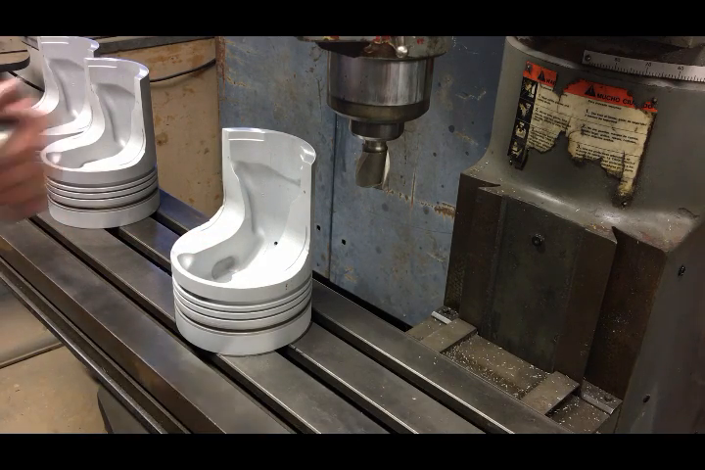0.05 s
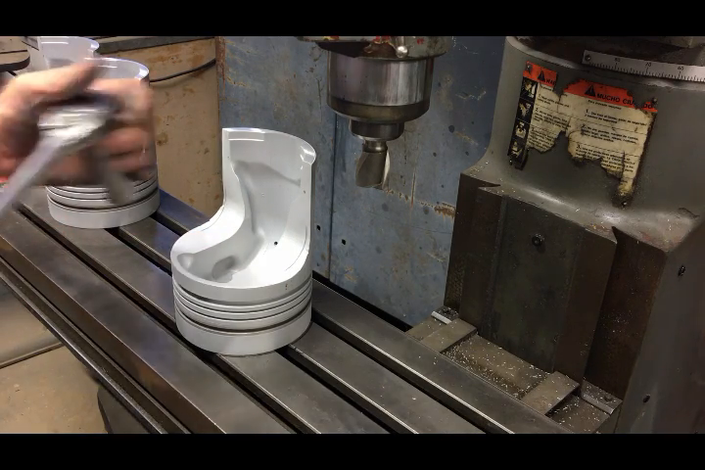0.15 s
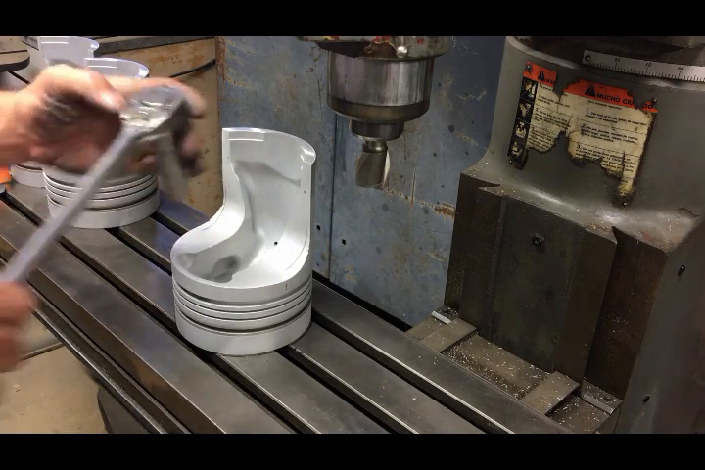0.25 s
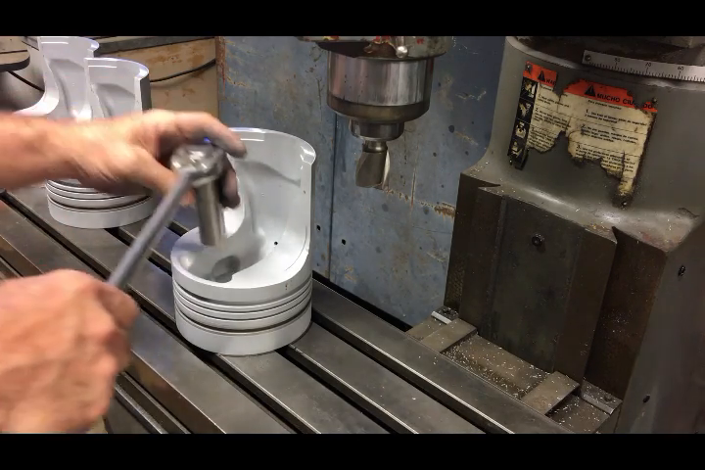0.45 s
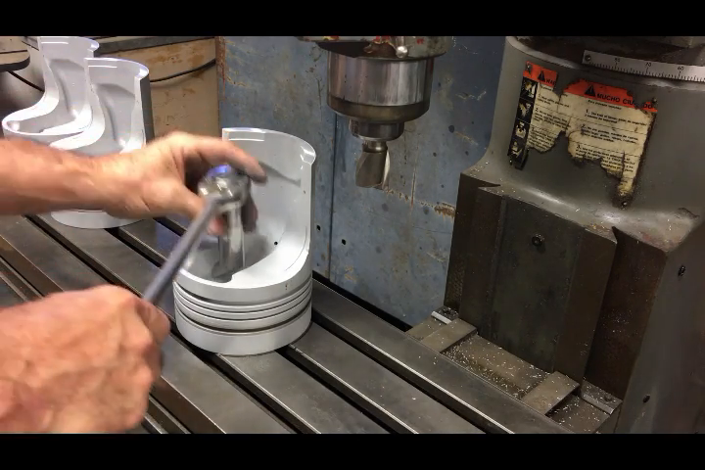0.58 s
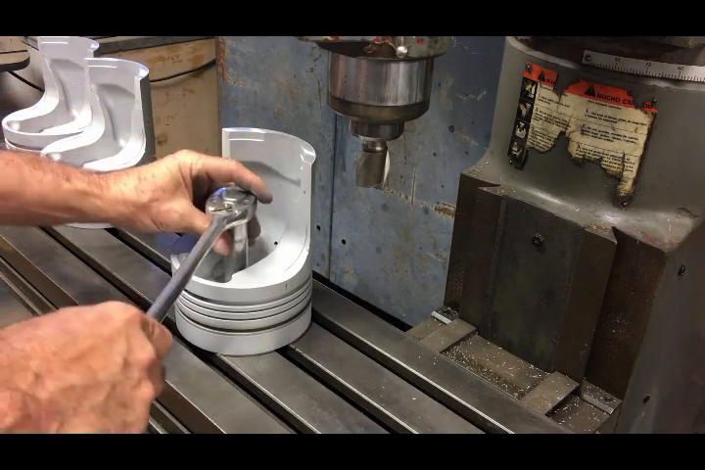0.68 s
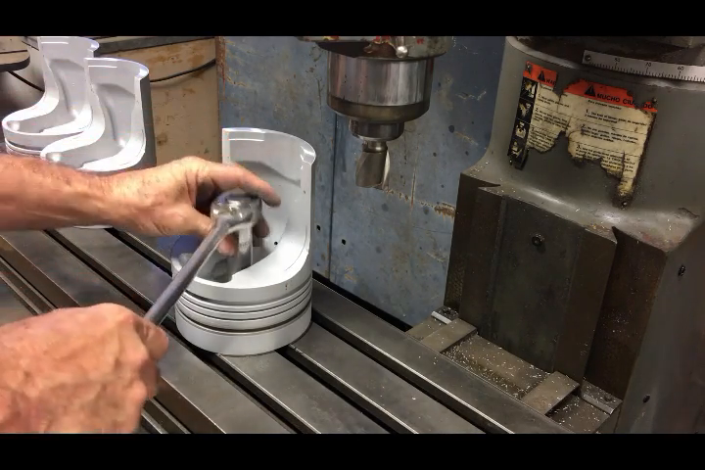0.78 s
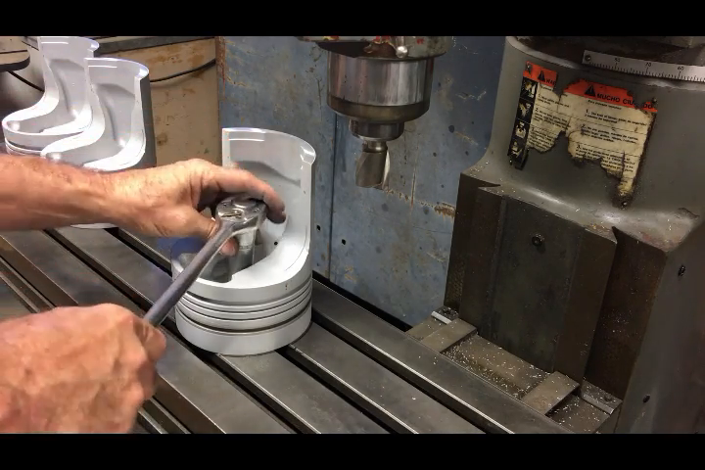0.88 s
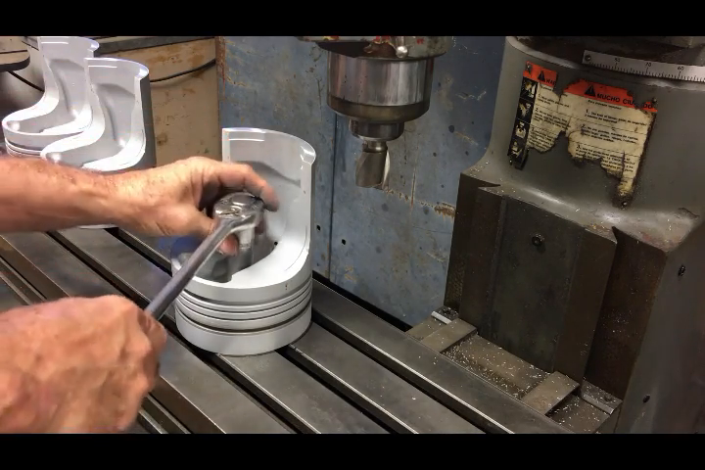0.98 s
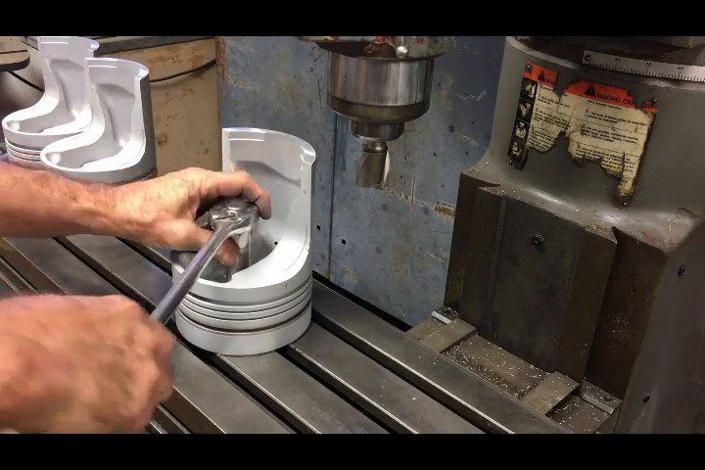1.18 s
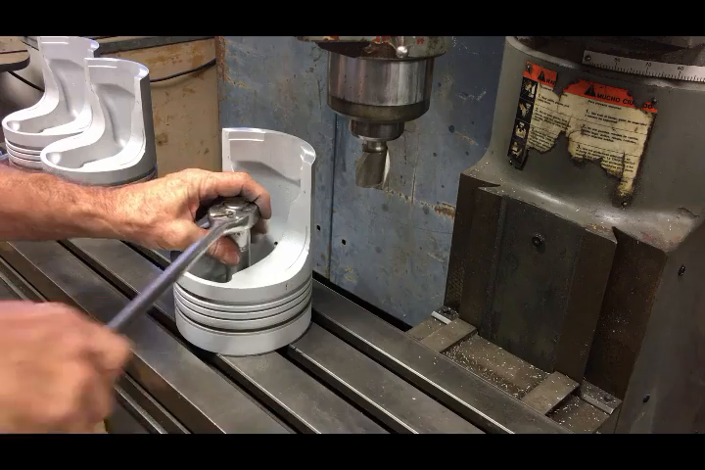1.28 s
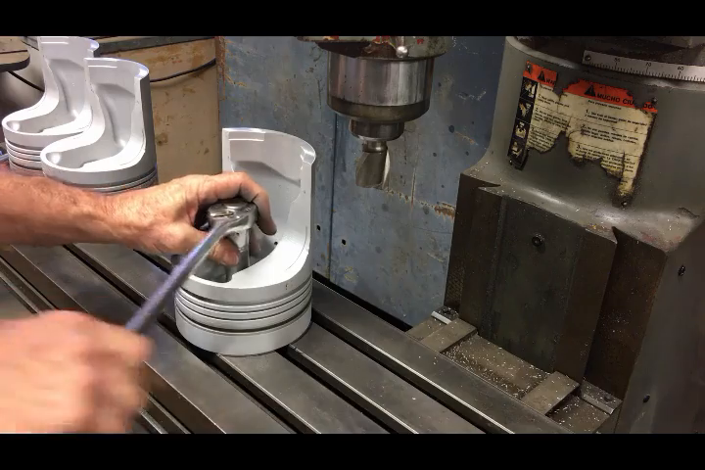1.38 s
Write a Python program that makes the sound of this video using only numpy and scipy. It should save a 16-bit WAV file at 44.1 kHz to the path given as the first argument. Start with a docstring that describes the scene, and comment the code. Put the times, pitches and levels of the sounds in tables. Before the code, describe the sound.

Sharp metallic clicks and clanks of a wrench being set into a piston, over low hum.

```python
"""Bright clicks come first: the loose jaws of a steel wrench being lowered into a heavy piston.
The wrench then knocks against the piston and seats with a clank. Each contact is a short crack
plus ringing modes. The milling table under the piston reflects the sound and thuds on firm
contacts, and the workshop answers with a short tail, over steady air and a low hum."""
import sys
import numpy as np
from scipy import signal
from scipy.fft import rfft, irfft, next_fast_len
from scipy.io import wavfile
from scipy.ndimage import uniform_filter1d

SR = 44100
rng = np.random.default_rng(int(sys.argv[2]) if len(sys.argv) > 2 else 0)


def store_pcm(level_fs):
    """Save levels as 16-bit WAV."""
    pcm = np.round(np.clip(level_fs, -1, 1) * 32767).astype(np.int16)
    wavfile.write(sys.argv[1], SR, np.atleast_2d(pcm).T)


N = 63945


def undb(db):
    """Decibels to gain."""
    return 10 ** (np.asarray(db) / 20)


def unit(x):
    """Scale to rms 1."""
    return x / np.sqrt(np.mean(x ** 2))


def fade(t, t60):
    """Exponential decay."""
    return np.exp(-np.log(1000) * t / max(t60, 1e-3))


def colour(x, points):
    """Causal filter through (Hz, dB) points."""
    hz, db = np.array(points, float).T
    n = 2 * next_fast_len(len(x))
    f = np.maximum(np.arange(n // 2 + 1) * SR / n, 1)
    cepstrum = irfft(np.log(undb(np.interp(np.log(f), np.log(hz), db))))
    cepstrum[1:n // 2] *= 2
    cepstrum[n // 2 + 1:] = 0
    return irfft(rfft(x, n) * np.exp(rfft(cepstrum)))[:len(x)]


def add(out, x, start_s):
    """Mix x into out from a given time."""
    i = int(max(start_s, 0) * SR)
    out[i:i + len(x)] += x[:len(out) - i]


# Tone bands of a contact, each set by one of its band_db values: centre_hz
BANDS_HZ = [1000, 2400, 5000, 9000, 13500]
ATTACK_S, CRACK_T60_S = 0.0006, 0.016
MODE_SCATTER_DB = 2  # each contact favours other modes
SPLIT_HZ = 62  # the parts are not quite symmetric, so each mode is a close pair


def strike(modes, crack_tone, hold_s, ring_db, spot_hz, spot_db, spot_t60_s, *band_db):
    """Metal on metal: a sharp crack that holds its level for a few milliseconds, then dies away,
    with ringing mode pairs and the struck spot's ping."""
    t = np.arange(SR // 4) / SR

    def partial(hz, db, t60):
        return undb(db) * fade(t, t60) * np.sin(2 * np.pi * (hz * t + rng.random()))

    crack_noise = rng.standard_normal(len(t)) * fade(np.maximum(t - hold_s, 0), CRACK_T60_S)
    crack = colour(crack_noise, crack_tone)
    body = 0
    for hz, db, t60 in modes:
        for side in (-1, 1):
            pitch_hz = hz + side * SPLIT_HZ * rng.random()
            body += partial(pitch_hz, db + MODE_SCATTER_DB * rng.standard_normal(), t60)
    ring = undb(ring_db) * body / np.sqrt(2) + partial(spot_hz, spot_db, spot_t60_s)
    hit = (crack + .5 * ring) * np.minimum(t / ATTACK_S, 1)
    return colour(hit, list(zip(BANDS_HZ, band_db)))


# Ring of the wrench: pitch_hz, level_db, t60_s
WRENCH_MODES = [(3733, -7, 0.04), (4580, -4, 0.058), (4840, -9, .045), (5620, -4, 0.073),
                (5646, -7.5, 0.067), (7060, -17, 0.098), (7570, -1, 0.022), (7630, -4.5, 0.068),
                (9400, -5.5, 0.047), (10650, -10, 0.048), (12300, -11, .025), (13400, -30, .03),
                (14470, -31, .04)]
# Crack of the jaws, their dense, quickly damped overtones: frequency_hz, level_db
JAW_CRACK_TONE = [(100, 1), (600, -9.5), (1400, -8.5), (1900, 4), (2700, 0.5), (3600, 2.5), (5600, 6),
                  (6500, -2.5), (7300, -2), (8400, -5), (9300, -1), (11500, -4.5), (13300, -1.5),
                  (16000, -9.5)]
# Jaw clicks: start_s, hold_s, ring_db, spot_hz, spot_db, spot_t60_s, five band_db
JAW_CLICKS = [ (0.1988, 0.0013, -10, 3800, -6, .02, -57, -29.5, -36, -40, -47),
              (0.2024, 0.0028, -0.5, 3690, 4, 0.045, -25, -22, -13.5, -10.5, -12),
              (0.2441, 0.0023, -0.5, 3580, 2.5, 0.037, -31, -27, -25, -31.5, -37),
              (0.2903, 0.0021, -7, 1448, 0, 0.053, -42, -26, -36.5, -31.5, -42),
              (0.566, 0.0028, -3, 5100, 5, .02, -35, -35, -55.5, -55, -68),
              (0.6119, 0.0019, -5, 7700, -5.5, 0.3, -40, -16.5, -19.5, -24.5, -14.5),
              (0.641, 0.0035, -1, 5640, 5.5, 0.04, -25, -23, -20.5, -18, -13),
              (0.6842, 0.0026, 2.5, 13350, 5, 0.022, -21.5, -22, -21.5, -21, -16),
              (0.7525, 0.002, -5.5, 7100, -1.5, 0.071, -26, -22.5, -23, -18.5, -13),
              (.7590, 0.0034, -8, 14000, 2, 0.017, -29, -39, -26, -22.5, -25)]


def jaw_clicks():
    """The loose jaws of the wrench click brightly on the way down."""
    out = np.zeros(N)
    for start_s, *contact in JAW_CLICKS:
        add(out, strike(WRENCH_MODES, JAW_CRACK_TONE, *contact), start_s)
    return out


# Bassy body of a thud: frequency_hz, level_db
THUD_TONE = [(40, -25), (80, 2), (250, -6), (450, -13), (1000, -19), (4000, -58)]
# Firm contacts that reach the milling table: start_s, level_db
TABLE_THUDS = [(0.2027, -40), (0.244, -45), (1.08, -41)]


def table_thuds():
    """The heavy table answers firm contacts with a dull thud."""
    out = np.zeros(N)
    t = np.arange(SR // 4) / SR
    for start_s, level_db in TABLE_THUDS:
        rumble = unit(colour(rng.standard_normal(len(t)), THUD_TONE))
        add(out, undb(level_db) * rumble * fade(t, t60=0.084), start_s)
    return out


# Ring of the piston: pitch_hz, level_db, t60_s
PISTON_MODES = [(948, -8.5, 0.039), (1050, -8.5, 0.041), (1825, -10.5, 0.083), (2247, -13, 0.11),
                (2800, -16, 0.039), (2890, -21, 0.032), (3520, -14, 0.076), (4830, -14, 0.081),
                (5540, -8.5, 0.087), (6435, 0, 0.052), (7100, -13, 0.086), (9270, -9.5, 0.056)]
# Crack of the piston, its dense, quickly damped overtones: frequency_hz, level_db
PISTON_CRACK_TONE = [(100, -10), (550, -24.5), (720, -7), (920, -0.5), (1200, -2.5), (1500, -2.5),
                     (2100, 0.5), (3000, 3.5), (3800, 0), (5400, 1.5), (8200, -5), (9300, -3),
                     (11500, -0.5), (13300, 0.5), (16000, -7)]
# Piston knocks: start_s, hold_s, ring_db, spot_hz, spot_db, spot_t60_s, five band_db
PISTON_KNOCKS = [ (.8760, 0.0018, -1.5, 4190, 10.5, 0.016, -21.5, -17.5, -18.5, -35, -32),
                 (.8778, 0.0012, 1, 12620, 2.5, 0.043, -17.5, -28, -23, -14, -21.5),
                 (0.8779, 0.0022, -5, 1175, 10, 0.02, -21.5, -14, -17.5, -15.5, -36),
                 (0.9831, 0.0011, -1, 2980, 10, 0.052, -39, -35, -51, -50, -55),
                 (0.988, 0.0018, -1.5, 1990, -9, .02, -21, -25.5, -49, -63, -59),
                 (0.9933, .001, -15, 4760, 1.5, 0.024, -38, -23.5, -33, -49, -47),
                 (1.0700, .002, 6, 2880, 13, 0.012, -24.5, -30.5, -46, -80, -76),
                 (1.0799, 0.0049, -1.5, 2156, 1.5, 0.032, -22.5, -14, -21, -13.5, -16.5),
                 (1.088, 0.0011, -2, 2848, 7.5, 0.027, -16.5, -17.5, -14, -29, -33),
                 (1.1166, 0.0036, 0.5, 2853, 12, 0.024, -17, -15, -18, -20, -28),
                 (1.1185, .002, -4, 887, 4.5, 0.025, -16.5, -19.5, -31, -37, -61),
                 (1.4262, .002, -27, 2210, 9, 0.011, -38, -25, -53.5, -56, -65)]


def piston_knocks():
    """The wrench knocks on the piston and seats in it with a clank."""
    out = np.zeros(N)
    for start_s, *contact in PISTON_KNOCKS:
        add(out, strike(PISTON_MODES, PISTON_CRACK_TONE, *contact), start_s)
    return out


# Reverb tail of the workshop: centre_hz, level_db, t60_s
ROOM_BANDS = [(300, -2.5, 0.37), (1000, -7.5, 0.4), (2230, -11, 0.35), (4900, -15, 0.59), (8700, -17, 0.47),
              (14900, -16, 0.16)]
REFLECTION_S, REFLECTION_DB = .0065, -13
ROOM_DELAY_S, ROOM_BUILD_S, ROOM_DB = .006, 0.0027, -1


def workshop(x):
    """Adds a hard reflection off the table and a diffuse tail whose very top dies first."""
    t = np.arange(SR // 2) / SR
    log_hz = np.log(np.maximum(np.fft.rfftfreq(len(t), 1 / SR), 1))
    log_centres = np.log([row[0] for row in ROOM_BANDS])
    noise_spectrum = rfft(rng.standard_normal(len(t)))
    tail = 0
    for share, (_, level_db, t60_s) in zip(np.eye(len(ROOM_BANDS)), ROOM_BANDS):
        band = irfft(noise_spectrum * np.interp(log_hz, log_centres, share), len(t))
        envelope = fade(t, t60_s) * (1 - np.exp(-t / ROOM_BUILD_S))
        tail += undb(level_db) * band * envelope / np.linalg.norm(envelope)
    out = x.copy()
    add(out, undb(REFLECTION_DB) * x, REFLECTION_S)
    add(out, undb(ROOM_DB) * signal.fftconvolve(x, tail)[:N], ROOM_DELAY_S)
    return out


def waver():
    """A smooth random drift with rms 1."""
    drift = uniform_filter1d(rng.standard_normal(N), size=1500)
    return unit(uniform_filter1d(drift, size=1500))


# Dark bed of shop air: frequency_hz, level_db
AIR_TONE = [(13, -35), (22, -22), (48, -1.5), (85, -2.5), (118, -6.5), (140, -6), (242, -6.5), (496, -10),
            (710, -9), (771, -8), (1130, -9), (2020, -19), (2200, -19), (2820, -26.5), (3230, -29.5),
            (11500, -34.5), (16000, -37)]
AIR_DB = -48
HUM_HZ, HUM_DB, HUM_WANDER_HZ, HUM_SWELL = 70.4, -54.5, 5.9, 0.64


def air_and_hum():
    """Under everything, steady air and a low hum that wavers in pitch and level."""
    air = unit(colour(rng.standard_normal(N), AIR_TONE))
    pitch_hz = HUM_HZ + HUM_WANDER_HZ * waver()
    hum = np.sin(2 * np.pi * np.cumsum(pitch_hz) / SR) * (1 + HUM_SWELL * waver())
    return undb(AIR_DB) * air + undb(HUM_DB) * unit(hum)


def scene():
    """Clicks and knocks ring in the workshop over dry thuds and the room tone, in mono."""
    metal = workshop(jaw_clicks()) + workshop(piston_knocks())
    return (metal + table_thuds() + air_and_hum())[None]


def record(dry):
    """Soft saturation rounds the loudest peaks and a steep low-pass cuts the top."""
    ceiling, top_hz = .48, 15900
    lowpass = signal.ellip(10, .2, 70, top_hz, fs=SR, output="sos")
    return signal.sosfilt(lowpass, ceiling * np.tanh(dry / ceiling))


dry = scene()
out = record(dry)
store_pcm(out)
```